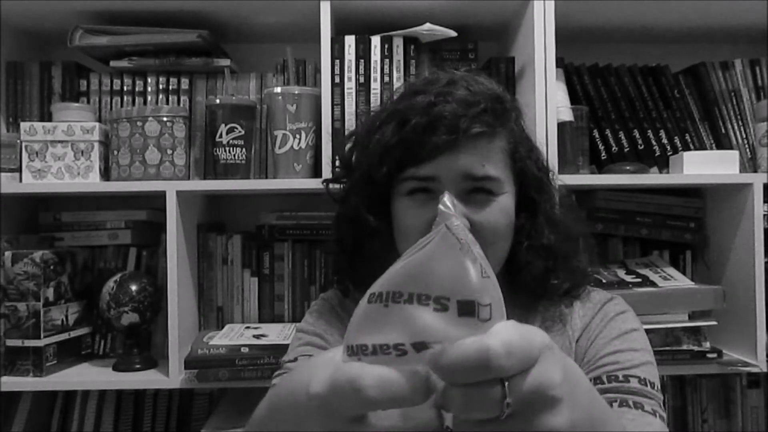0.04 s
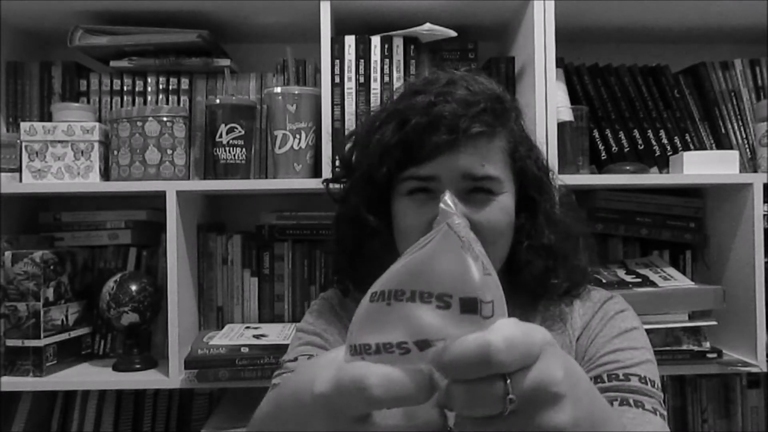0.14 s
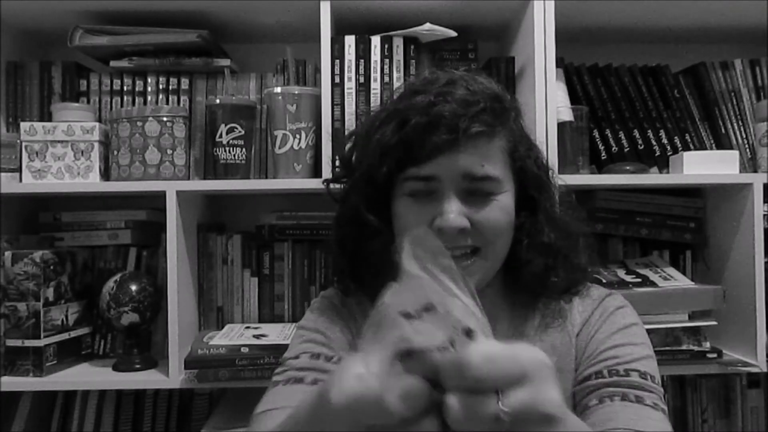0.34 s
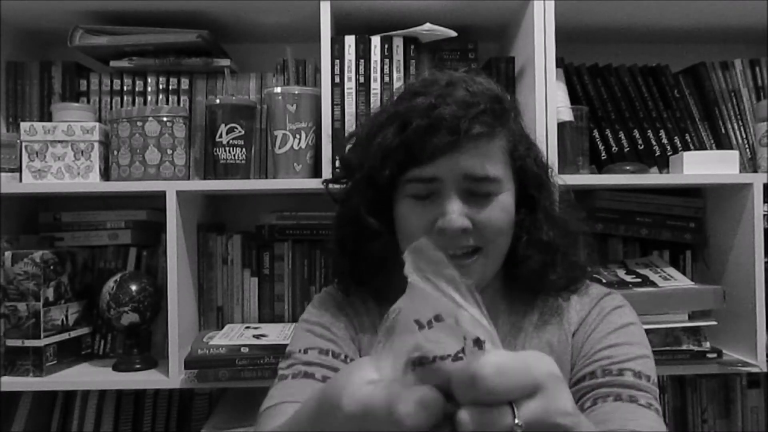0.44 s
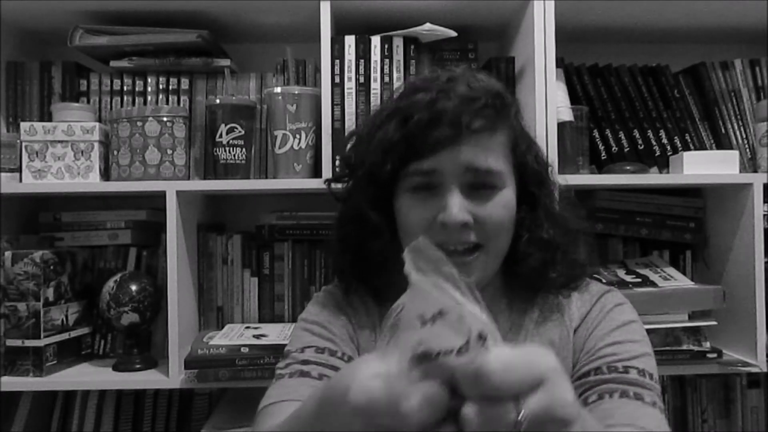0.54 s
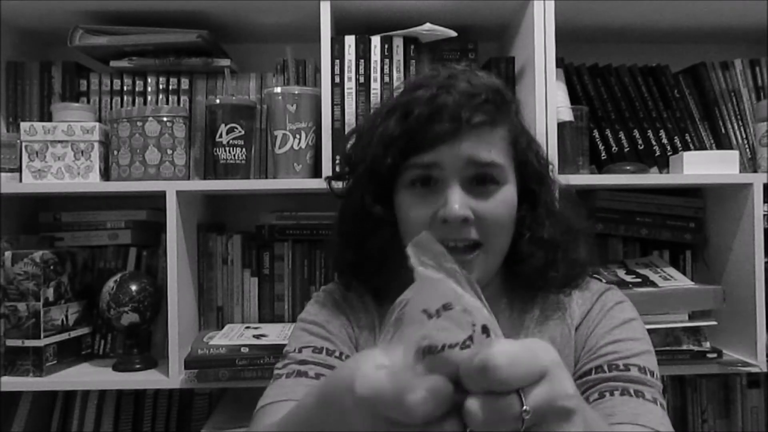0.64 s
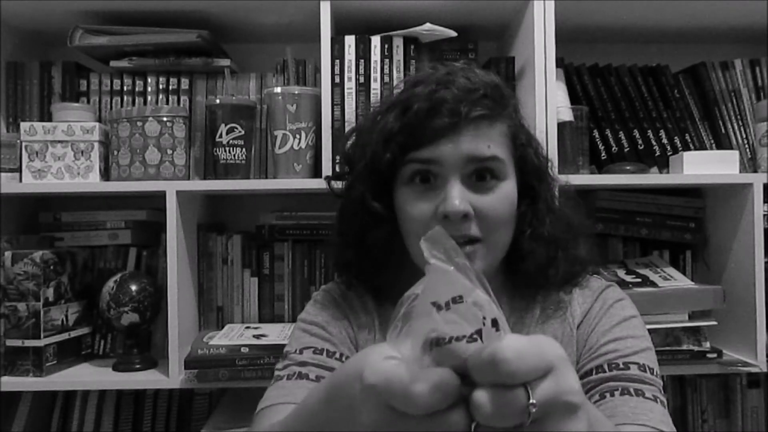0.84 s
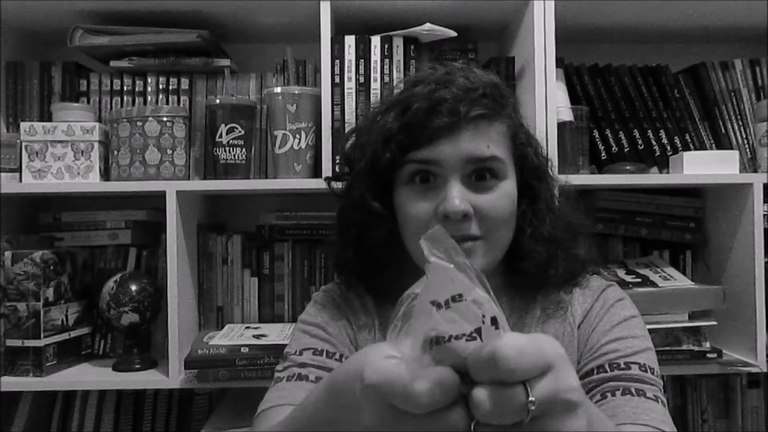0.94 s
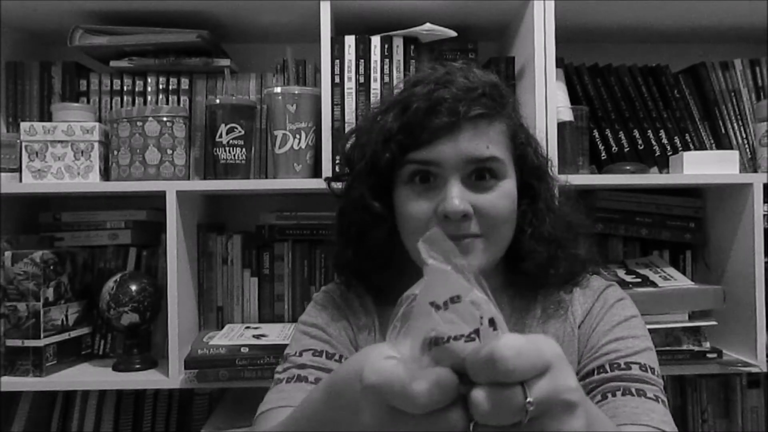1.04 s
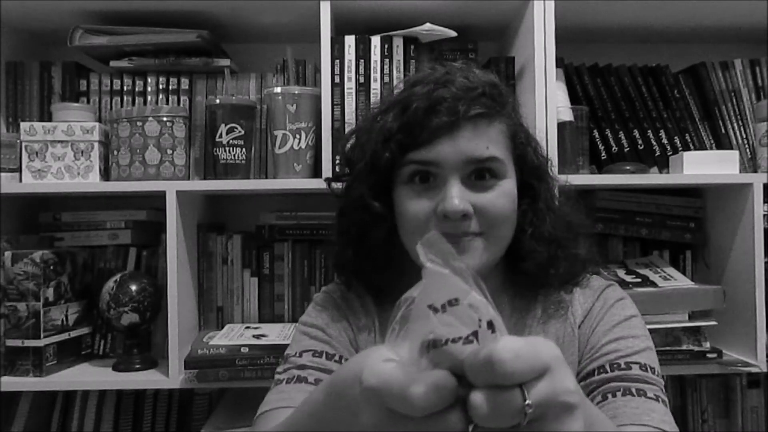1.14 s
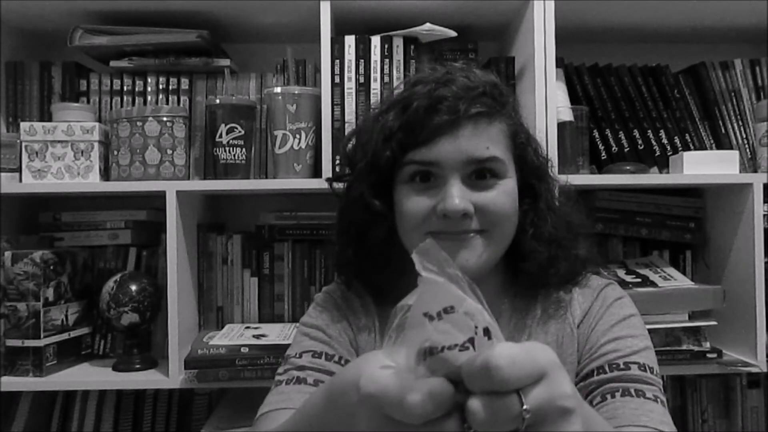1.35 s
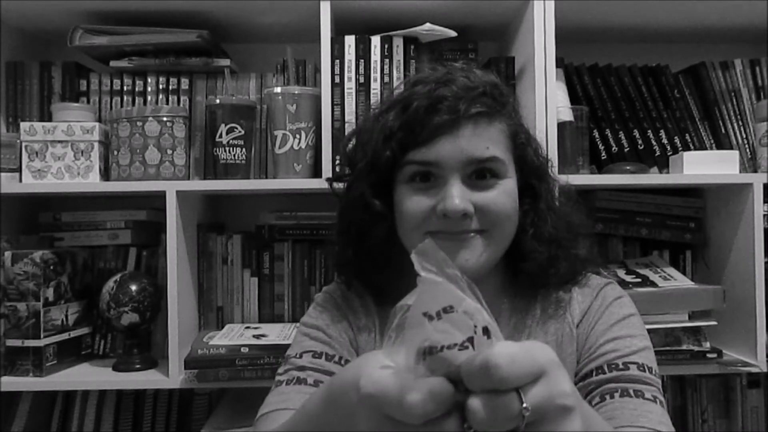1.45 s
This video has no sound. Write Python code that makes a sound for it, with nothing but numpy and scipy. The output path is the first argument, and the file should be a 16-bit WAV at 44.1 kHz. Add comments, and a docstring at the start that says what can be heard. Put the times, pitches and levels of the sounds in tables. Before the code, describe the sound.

One sharp pop of a squeezed plastic packing pillow, with faint crinkling before and after.

```python
"""Air pillow bursting

A plastic air pillow is squeezed close to the microphone in a small room lined with shelves.
The stretched film crackles, then bursts: the pressure pulse overloads the recorder and the room rings on.
Afterwards the slack film ticks faintly in the hands, over a low room rumble."""
import sys
import numpy as np
from scipy import signal
from scipy.fft import rfft, irfft
from scipy.io import wavfile
from scipy.ndimage import uniform_filter1d

SR = 44100
rng = np.random.default_rng(int(sys.argv[2]) if len(sys.argv) > 2 else 0)


def dump_mix(stems):
    """Bounce the given channels to the path in sys.argv[1] as a 16-bit WAV at rate SR."""
    frames = np.atleast_2d(stems).T  # one column per channel
    limited = np.clip(frames, -1, 1)  # hard clip at full scale
    pcm = np.round(limited * 32767).astype(np.int16)
    wavfile.write(sys.argv[1], SR, pcm)


N = 66150
POP_S = 0.2068


def undb(db):
    """Decibels to gain."""
    return 10 ** (np.asarray(db) / 20)


def pan(db):
    """Stereo gains for a left-minus-right level difference."""
    return undb(np.array([[db], [-db]]) / 2)


def per_bin(table):
    """Interpolate a (freq_hz, value) table at every FFT bin."""
    hz, value = np.array(table).T
    return np.interp(np.log(np.arange(N // 2 + 1) * SR / N + 1), np.log(hz), value)


def unit(x):
    """Scale to rms 1."""
    return x / np.sqrt(np.mean(x ** 2))


def colour(x, table):
    """Filter by a (freq_hz, gain_db) table, then scale to rms 1."""
    return unit(irfft(rfft(x) * undb(per_bin(table)), N))


def decay(age, decay_s):
    """Exponential decay, silent before age 0."""
    return (age >= 0) * np.exp(-np.maximum(age, 0) / decay_s)


def ping(age, hz, decay_s, attack_s=.0002):
    """Damped sine with a rounded onset."""
    return np.sin(2 * np.pi * hz * age) * decay(age, decay_s) * (1 - decay(age, attack_s))


# Left-right likeness of the room: freq_hz, correlation
ROOM_CORRELATION = [(60, .6), (150, 1), (300, .5), (640, 0.0084), (1400, 0.028), (10000, 0.034)]
def diffuse_noise():
    """Stereo noise, alike in the bass and unrelated in the treble."""
    correlation = per_bin(ROOM_CORRELATION)
    mid, side = rfft(rng.standard_normal((2, N)))
    spectrum = mid * np.sqrt(1 + correlation) + np.array([[1], [-1]]) * side * np.sqrt(1 - correlation)
    return unit(irfft(spectrum, N))


# Rumble and hiss spectrum: freq_hz, gain_db
RUMBLE_SPECTRUM = [(15, -11), (32, -3), (55, -14), (110, -21.5), (200, -24), (300, -26.5), (600, -33.5),
                   (2000, -41), (6000, -48), (11000, -62)]
def rumble(t, floor_db=-66, shove_db=-44):
    """Steady room floor, plus air shoved by the taut pillow until it bursts."""
    floor = undb(floor_db) * colour(diffuse_noise(), RUMBLE_SPECTRUM)
    shoved_air = undb(shove_db) * colour(diffuse_noise(), RUMBLE_SPECTRUM)
    return floor + shoved_air * decay(np.maximum(t - POP_S, 0), decay_s=.077)


# Plastic film spectrum: freq_hz, gain_db
FILM_SPECTRUM = [(100, -4.5), (300, -3), (500, -4), (950, -5), (1400, 0), (2000, -2.5), (3500, -3.5),
                 (5200, .5), (7000, -6.5), (9000, -22.5), (11000, -38)]
def film_noise(envelope=1):
    """Stereo noise with the timbre of the film, at rms 1."""
    return colour(envelope * rng.standard_normal((2, N)), FILM_SPECTRUM)


# Crackle as the hands squeeze and let go: time_s, level_db
SQUEEZE_LEVELS = [(0, -39.5), (.05, -48.5), (.12, -44), (.155, -39.5), (.2, -40), (.26, -49.5), (.6, -66.5),
                  (.8, -82), (1.02, -80.5), (1.08, -73), (1.2, -83), (1.31, -80.5), (1.39, -75), (1.5, -78)]
def crackle(t, taut_per_s=900, slack_per_s=110, spread_db=1.5, decay_s=.0014):
    """Tiny slips of film under the fingers: dense while taut, sparse once slack."""
    rate_per_s = np.where(t < POP_S, taut_per_s, slack_per_s)
    onsets = rng.random(N) < rate_per_s / SR
    slips = onsets * undb(spread_db * np.minimum(rng.exponential(size=N), 3))
    energy = signal.lfilter([1], [1, -np.exp(-2 / (decay_s * SR))], slips ** 2 / rate_per_s + 1e-18)
    level_db = np.interp(t, *np.array(SQUEEZE_LEVELS).T)
    return film_noise(np.sqrt(energy)) * undb(level_db)


# Creases snapping: start_s, level_db, pitch_hz, decay_s, pocket_relative_db
CREASE_SNAPS = [(.038, -30, 4400, 0.00083, -6), (.063, -29, 4630, .003, 3.5),
                (0.081, -33.5, 5370, 0.0019, -15), (.131, -19.5, 4730, 0.0015, -4),
                (0.1498, -29, 2780, 0.0034, -23), (0.1528, -30, 3720, 0.0021, -12),
                (0.1603, -25.5, 2550, .0015, -14), (.170, -35, 3208, .003, 12.5),
                (0.1965, -25.5, 3980, .002, 10), (.617, -50, 4270, 0.0014, -15),
                (0.6917, -44, 4000, .0012, -17), (.745, -55, 3317, .001, -9), (.772, -58, 3783, .0015, -21),
                (.814, -57.5, 3510, .001, -12), (.856, -56.5, 5194, .002, -10),
                (0.877, -48.5, 2692, 0.0009, 2), (.935, -61, 3017, .002, -14),
                (.973, -59, 3006, 0.0019, -8), (1.057, -52.5, 3804, .001, -16),
                (1.066, -52, 2714, 0.0014, -8), (1.0911, -44.5, 4525, 0.00068, -8),
                (1.098, -50.5, 4500, .0007, 0.5), (1.146, -59.5, 3486, 0.00083, -4),
                (1.160, -55.5, 4203, 0.00098, -10), (1.1928, -37.5, 4450, .001, -8),
                (1.3817, -52.5, 3805, 0.00099, -1), (1.3952, -40, 4330, 0.00096, -5),
                (1.467, -47, 3400, 0.0021, -19)]
def creases(t, pocket_hz=1351, band_ratio=1.26, click_db=-16):
    """Each crease clicks and briefly rings a patch of film and the air pocket behind it."""
    out = np.zeros((2, N))
    highpass = signal.butter(3, pocket_hz, "high", fs=SR, output="sos")
    click_noise = unit(signal.sosfilt(highpass, film_noise()))
    for start_s, level_db, pitch_hz, decay_s, pocket_db in CREASE_SNAPS:
        span = slice(int(start_s * SR), int(start_s * SR) + SR // 40)
        age = t[span] - start_s
        envelope = decay(age, decay_s)
        band = signal.butter(2, [pitch_hz / band_ratio, pitch_hz * band_ratio], "band", fs=SR, output="sos")
        patch = unit(signal.sosfilt(band, rng.standard_normal(len(age)) * envelope))
        patch *= np.sqrt(np.mean(envelope ** 2) / 2)  # rms of a sine under this envelope
        pocket = ping(age, pocket_hz * (1 + .04 * rng.standard_normal()), decay_s=.00082)
        click = click_noise[:, span] * envelope
        out[:, span] += undb(level_db) * (patch + undb(pocket_db) * pocket + undb(click_db) * click)
    return out


# Room decay: freq_hz, t60_s
ROOM_DECAY = [(50, 0.24), (150, 0.39), (300, 0.44), (550, 0.46), (950, 0.54), (1400, 0.42), (2500, .46),
              (5000, .42), (9000, .32)]
def room_fade(x, age):
    """Fade each band at the room's own rate."""
    count = N // 2  # silent beyond this
    spectrum, out = rfft(x[:, :count]), np.zeros((2, N))
    band_hz, t60s = np.array(ROOM_DECAY).T
    bin_hz = np.arange(spectrum.shape[1]) * SR / count
    band_index = np.interp(np.log(bin_hz + 1), np.log(band_hz), np.arange(len(band_hz)))
    for k, t60_s in enumerate(t60s):
        band = irfft(spectrum * np.maximum(1 - np.abs(band_index - k), 0), count)
        out[:, :count] += band * decay(age[:count], t60_s / np.log(1000))
    return out


def reverb(x, t):
    """Diffuse room reflections of a small sound, at equal energy."""
    response = room_fade(diffuse_noise(), t)
    response /= np.sqrt(np.sum(response ** 2) / 2)
    return signal.fftconvolve(x, response, axes=1)[:, :N]


def burst(t, suction_s=.00072, push_s=.0011, flap_hz=598.3, skin_hz=1230):
    """The film rips: pressure pulse and slow recovery, flapping torn edge, ringing emptied skin."""
    age = t - POP_S
    after_pulse = age - suction_s - push_s
    pulse = undb(11) * (age >= 0) * (after_pulse < 0) * np.where(age < suction_s, -1, 1)
    recovery = undb(4.5) * decay(after_pulse, .0021) * pan(10)
    pressure = uniform_filter1d(pulse - recovery, size=5)
    tear = undb(3) * film_noise() * decay(age, .0022) * pan(-5.5)
    wobble = unit(uniform_filter1d(rng.standard_normal(N), size=60))
    flap_cycles = np.cumsum((after_pulse >= 0) * flap_hz * (1 + .27 * wobble)) / SR
    flap = undb(-1.5) * np.sin(2 * np.pi * flap_cycles) * decay(after_pulse, .006) * pan(-20)
    skin = undb(.5) * ping(after_pulse, skin_hz, decay_s=.0054)
    return pressure + tear + flap + skin


def wall_echo(t, delay_s=.0149, width_s=.0004):
    """First echo of the burst: a rounded pulse from the nearest wall."""
    return undb(1.5) * np.exp(-((t - POP_S - delay_s) / width_s) ** 2) * pan(8.5)


# Reflected burst spectrum: freq_hz, gain_db
WASH_SPECTRUM = [(25, -14.5), (70, -15), (130, -7), (220, -7.5), (320, -3), (520, 3.5), (770, -2.5),
                 (930, -12.5), (1230, -9.5), (1800, -20.5), (2700, -25), (3400, -23), (5200, -24),
                 (7500, -34), (10500, -53.5)]
# Room resonances: pitch_hz, level_db, t60_s
ROOM_RESONANCES = [(152, -23, .35), (183.6, -27, 0.52), (297.1, -15, .3), (372.2, -17, .36),
                   (441.7, -22, .36), (443, -51, 1.7), (482, -52, 1.7), (524.5, -19.5, 0.39),
                   (556, -22, 0.43), (576, -50.5, 1.5), (605, -22, .36), (724.6, -23, .34),
                   (799, -22, 0.31)]
# Ring of the shelves and their contents: freq_hz, gain_db
SHELF_SPECTRUM = [(150, -27), (330, -12.5), (430, -1), (485, -2), (530, -5), (580, -3), (690, -3),
                  (850, -10.5), (1200, -10.5), (2000, -23), (4000, -27.5), (8000, -50)]
def room_ring(age, build_s=.007, hold_s=.027, shelf_t60_s=1.24):
    """Reflections of the burst build, hold and fade; resonances stand out and the shelves ring on."""
    build = 1 - np.exp(-(age / build_s) ** 2)
    fade_age = np.hypot(age, hold_s) - hold_s
    wash = undb(-5.5) * room_fade(colour(diffuse_noise(), WASH_SPECTRUM), fade_age)
    modes = np.zeros(N)
    for pitch_hz, level_db, t60_s in ROOM_RESONANCES:
        tone = np.sin(2 * np.pi * (pitch_hz * age + rng.random()))
        modes += undb(level_db) * tone * decay(fade_age, t60_s / np.log(1000))
    shelves = undb(-37.5) * colour(diffuse_noise(), SHELF_SPECTRUM) * decay(age, shelf_t60_s / np.log(1000))
    ringing = build * (wash + modes + shelves)
    return np.pad(ringing, ((0, 0), (int(POP_S * SR), 0)))[:, :N]  # delay to the burst


def scene():
    """Squeeze, burst and faint ticking in the room."""
    t = np.arange(N) / SR
    snaps, slips = creases(t), crackle(t)
    film = snaps + slips + reverb(undb(-9) * snaps + slips, t)
    return film + burst(t) + wall_echo(t) + room_ring(t) + rumble(t)


def follow_level(x, attack_s=.006, release_s=.15):
    """Level follower: quick rise, slow fall, 1 ms steps."""
    step = SR // 1000
    starts = np.arange(0, N, step)
    level, levels = 0., []
    for block_mean in np.add.reduceat(x, starts) / step:
        lag_s = attack_s if block_mean > level else release_s
        level += (block_mean - level) * step / SR / lag_s
        levels.append(level)
    return np.interp(np.arange(N), starts + step, levels)


def record(dry, treble_top_hz=10800, full_level_duck_db=-3.5):
    """The top treble is rolled off and the burst overloads; gain control then dips briefly."""
    heard = signal.sosfiltfilt(signal.butter(10, treble_top_hz, fs=SR, output="sos"), dry)
    clipped = heard / (1 + heard ** 4) ** .25
    level = follow_level(np.abs(clipped).max(axis=0))
    ducked = clipped * undb(full_level_duck_db * level ** 2)
    softened = signal.sosfilt(signal.butter(3, 15010, fs=SR, output="sos"), ducked)
    return signal.sosfilt(signal.ellip(6, .05, 60, 16000, fs=SR, output="sos"), .94 * softened)


dry = scene()
out = record(dry)
dump_mix(out)
```